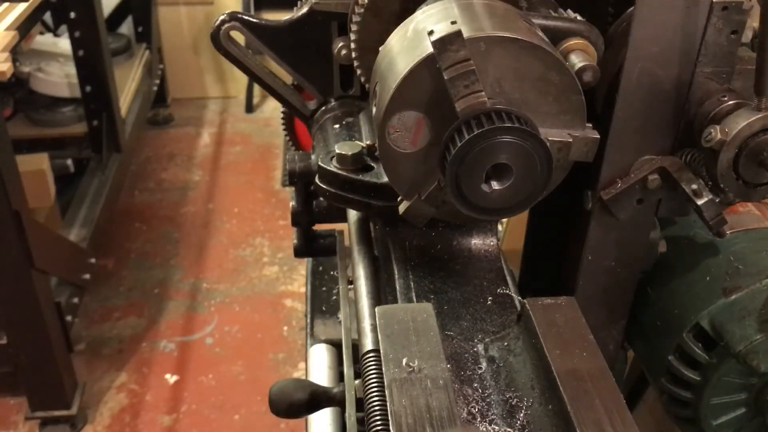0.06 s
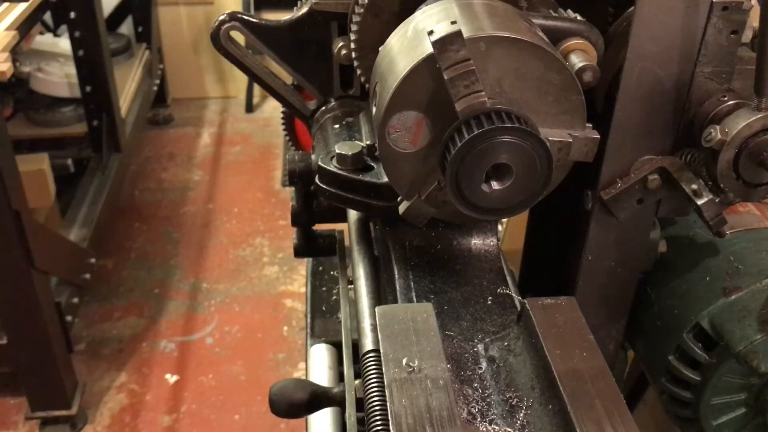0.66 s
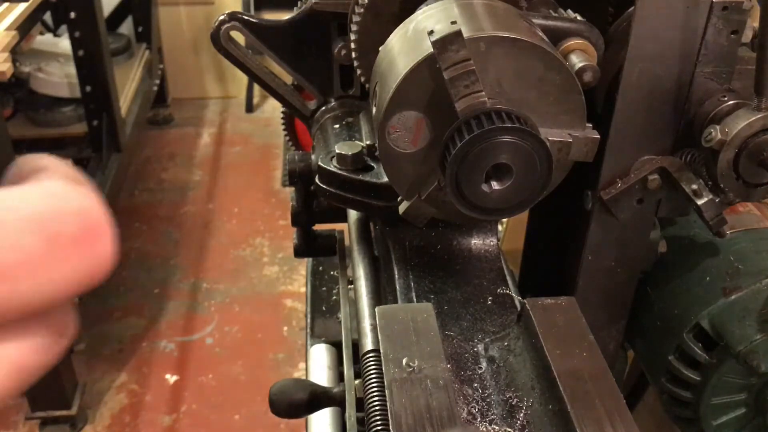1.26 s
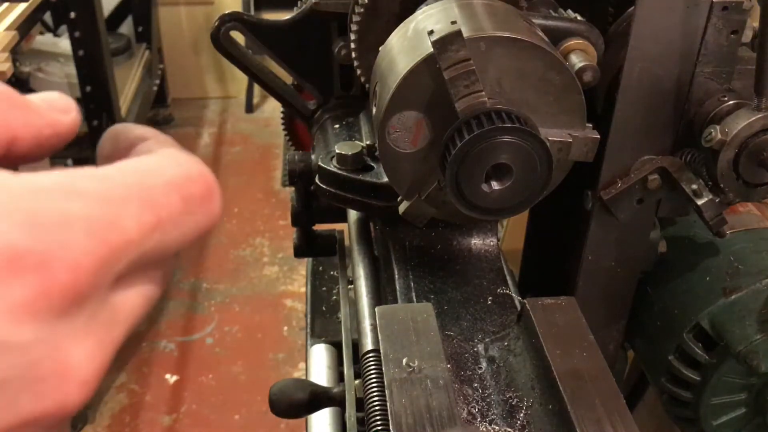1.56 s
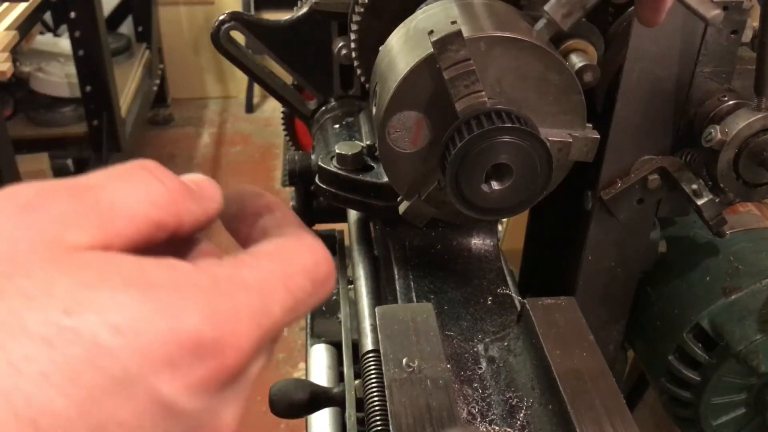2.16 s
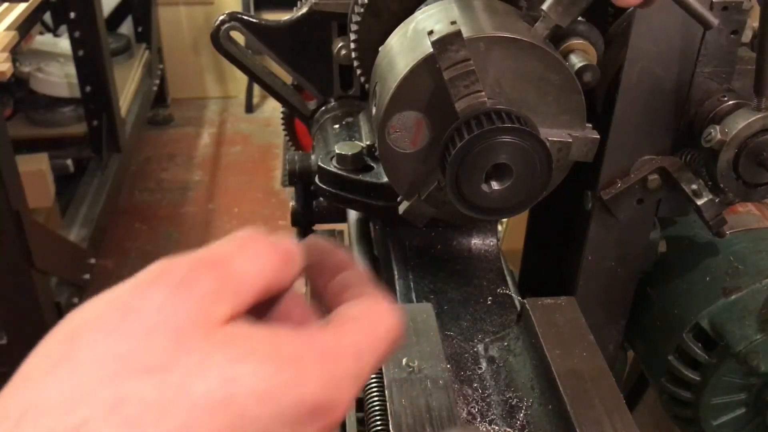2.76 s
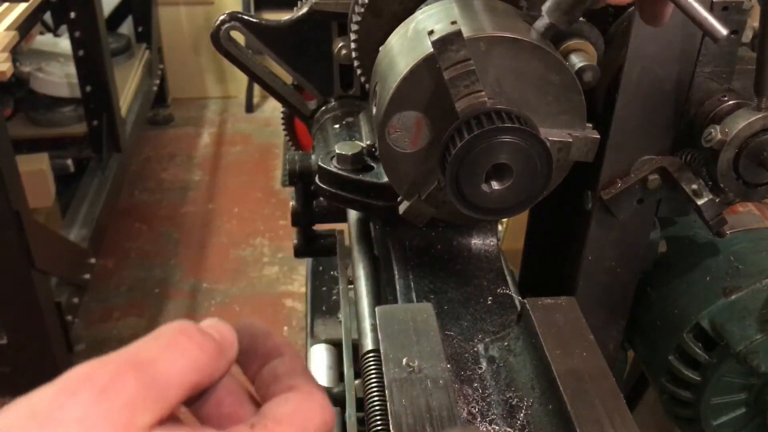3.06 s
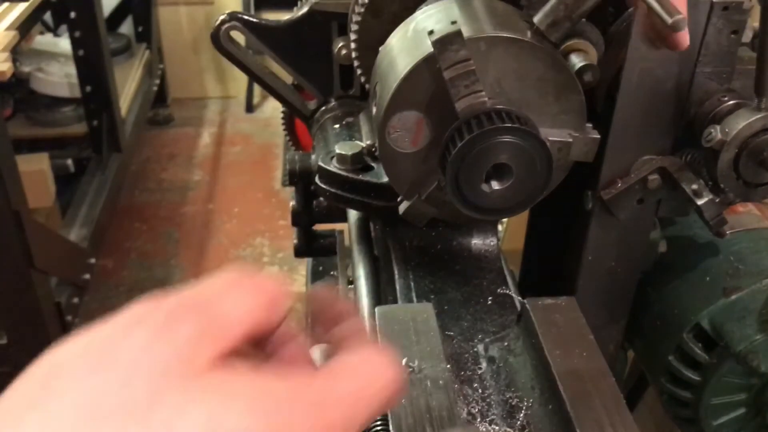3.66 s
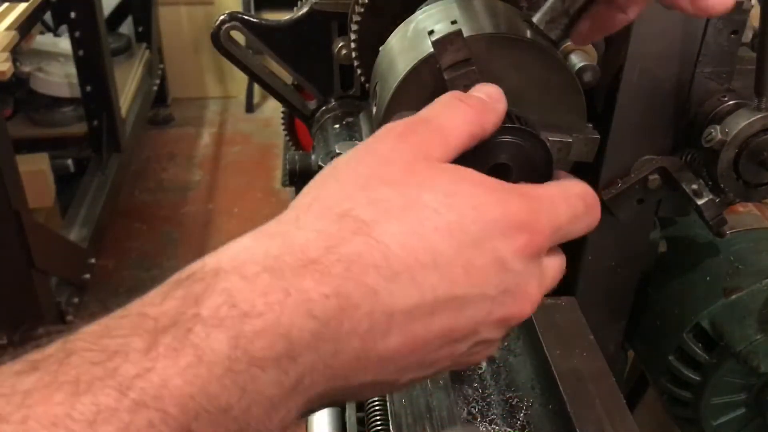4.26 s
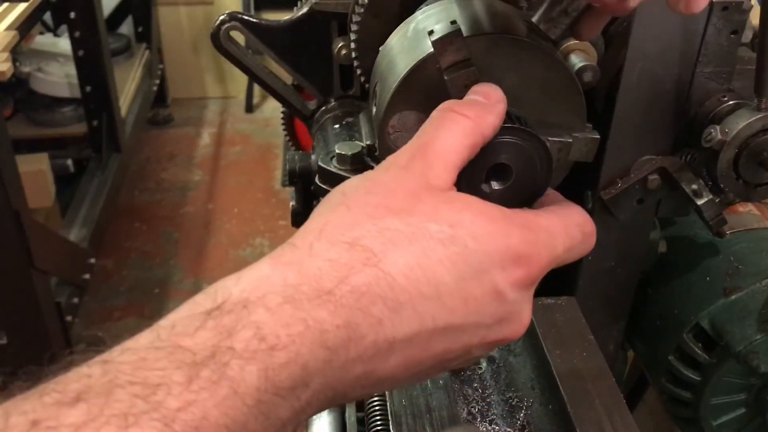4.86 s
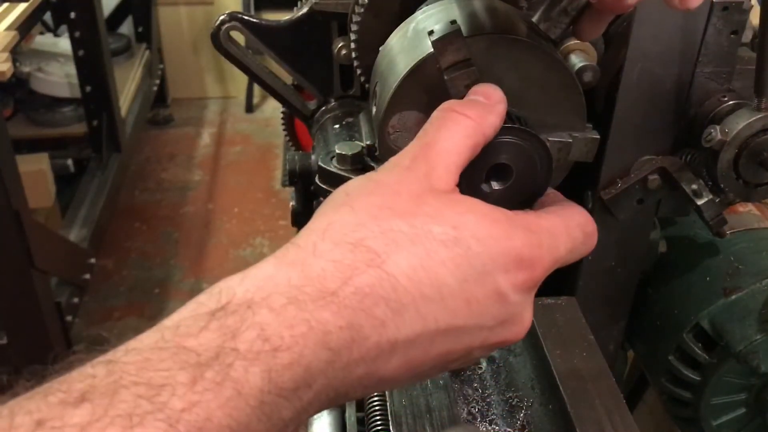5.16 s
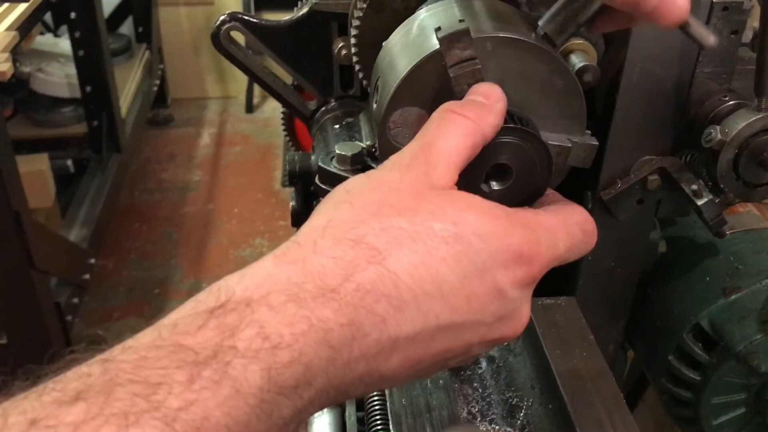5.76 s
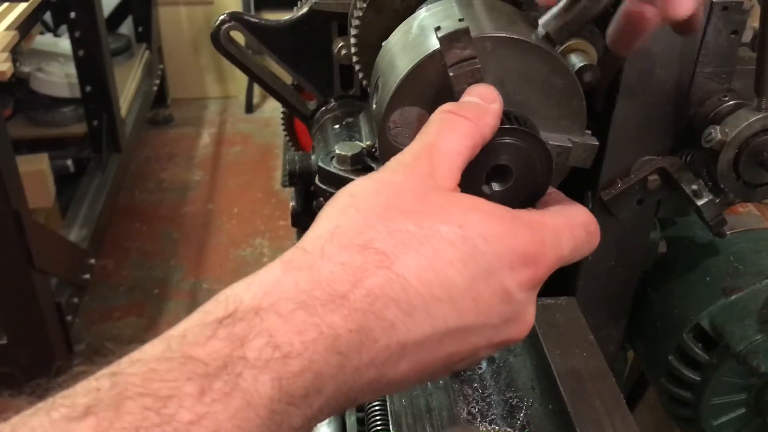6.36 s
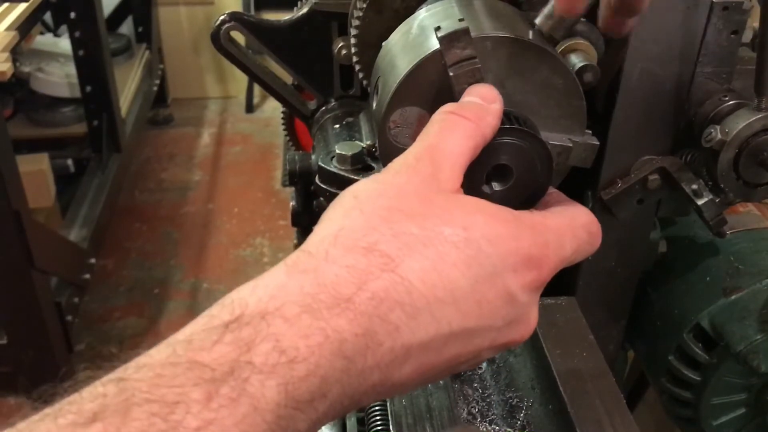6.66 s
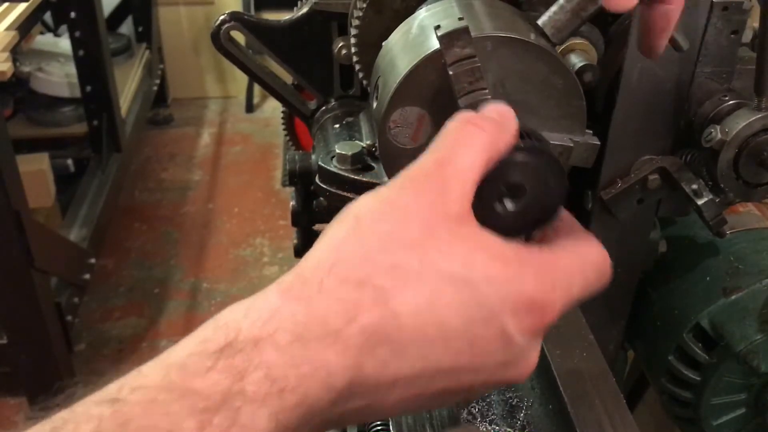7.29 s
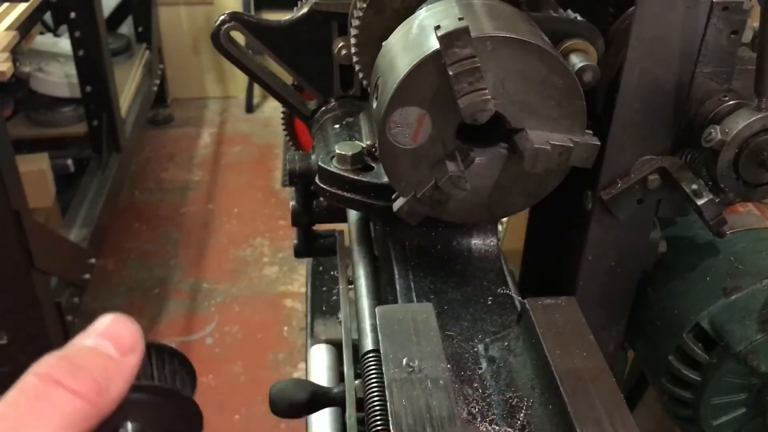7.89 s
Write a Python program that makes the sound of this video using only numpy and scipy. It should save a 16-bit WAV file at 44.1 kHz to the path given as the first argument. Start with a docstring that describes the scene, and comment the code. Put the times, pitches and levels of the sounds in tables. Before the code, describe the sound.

In a quiet small workshop, something scuffs briefly and is set down on wood with a knock. A steel key clinks into the chuck of a stopped lathe, then frees it with one sharp clack and a low shudder. Irregular clicks and short scrapes follow as the key turns, ending with light taps as a small metal part comes out. The sounds are close, with faint sleeve rustle and low room rumble behind them.

```python
"""A lathe stands still in a small workshop, amid faint room rumble and the rustle of a sleeve. Something
scuffs over wood and is set down with a knock. Fingers slide on a steel key and fit it into the chuck;
each contact rings the steel. The key takes up the slack and frees the chuck with a sharp clack that
shakes the bed. It is then turned in short strokes, scroll and jaws clicking and scraping as they stick
and slip, and at last a small metal part is drawn out."""
import sys
import numpy as np
from scipy import signal
from scipy.fft import rfft, irfft
from scipy.io import wavfile

SR = 44100
rng = np.random.default_rng(int(sys.argv[2]) if len(sys.argv) > 2 else 0)


def store_wav(level_fs):
    """Save 16-bit WAV to argv[1]."""
    pcm = np.round(np.clip(np.atleast_2d(level_fs), -1, 1) * 32767)
    wavfile.write(sys.argv[1], SR, pcm.T.astype(np.int16))


N = 349713
TIME = np.arange(N) / SR
TAIL = np.arange(SR // 2) / SR  # time axis of an impulse response

# Levels in the tables are relative; the functions apply further gains.
# hum of the workshop: pitch_hz, level_db
HUM = [(69, -83.5), (98.5, -74)]
# spectrum of the room's rumble and hiss: frequency_hz, level_db
AIR_SPECTRUM = [(20, -42), (33, -11.5), (48, -1.5), (70, 0.5), (85, -7.5), (110, -10.5), (170, -13.5),
                (300, -17), (640, -23.5), (1700, -30), (4800, -36.5), (8600, -39.5), (10400, -41),
                (13000, -35.5), (16000, -45)]
# spectrum of a faint electrical tick: frequency_hz, level_db
TICK_SPECTRUM = [(9500, -34), (11500, 10), (16000, -2)]
# dull thuds under the work: start_s, length_s, level_db
THUDS = [(3.32, 0.36, -60.5), (5.68, 0.31, -58.5), (6.53, .14, -56)]
# spectrum of the thuds: frequency_hz, level_db
THUD_SPECTRUM = [(25, -26.5), (42, -12), (60, 7.5), (105, -2), (140, -44.5), (400, -49.5)]
# movement of the arm, as the strength of its rustle: time_s, level_db
ARM_MOVEMENT = [(0.0, -78.5), (1.04, -81.5), (1.63, -77), (2.63, -79.5), (3.03, -77), (3.84, -78.5),
                (4.39, -78), (4.82, -81), (5.32, -81.5), (5.56, -78), (6.29, -79), (6.4, -80.5),
                (6.85, -77), (6.96, -79), (7.09, -78), (7.35, -79.5), (7.53, -72), (7.93, -76)]
# spectrum of rubbing cloth: frequency_hz, level_db
CLOTH_SPECTRUM = [(150, -19.5), (300, 3), (700, 2.5), (1500, 0), (4500, -4), (6800, -3), (8000, -8),
                  (9400, -3), (10500, -9), (13000, -7), (16000, -8)]
# bright hiss of the scuff on wood (first row), then of fingers on key and part:
# start_s, length_s, level_db
SLIDES = [(.64, 0.034, -62), (1.4, 0.055, -67), (1.61, .057, -70.5), (1.77, 0.18, -71),
          (5.38, 0.082, -68.5), (5.7, 0.055, -62.5), (6.05, 0.2, -63.5), (6.3, 0.065, -64),
          (6.36, 0.061, -64), (6.73, 0.18, -69.5), (7.02, 0.077, -68), (7.27, 0.07, -64), (7.6, 0.13, -68)]
# spectrum of that sliding hiss: frequency_hz, level_db
SLIDE_SPECTRUM = [(300, -21), (1000, 1.5), (5000, -5), (9000, 1.5), (10500, -1.5), (14000, 4), (16000, -4)]

# scuffs on the wood before the knock: start_s, length_s, level_db
SCUFFS = [(.58, 0.077, -62.5), (.645, 0.029, -50), (.66, 0.048, -54.5), (.705, 0.04, -63)]
# spectrum of the scuffs: frequency_hz, level_db
SCUFF_SPECTRUM = [(60, -27), (170, 2.5), (280, 8), (450, -2.5), (950, -4.5), (1600, -12.5), (2450, -11),
                  (3500, -17), (6000, -26), (15000, -35)]
# spectrum of the impact on wood: frequency_hz, level_db
WOOD_CRACK_SPECTRUM = [(50, -4), (170, -1.5), (280, 9), (450, 13), (750, 8.5), (900, 2), (1200, 12),
                       (1600, -5.5), (1950, 5.5), (3000, -5), (4300, -8), (5000, -16), (6200, -17),
                       (15000, -25)]
# modes of the wood: pitch_hz, level_db, t60_s
WOOD_MODES = [(290, 4, 0.12), (380, -20, 0.21), (493, 0, 0.2), (540, -3, 0.058), (604, -3, 0.085),
              (755, -9, 0.22), (1016, -15, .09), (1160, -2, 0.051), (1260, -7, 0.046), (1950, 0, 0.083),
              (2140, -12, 0.17), (2720, 0, 0.082), (3000, -9, 0.067)]
# thin ring after the knock: start_s, length_s, level_db
THIN_RING = [(.78, 0.14, -69.5)]
# spectrum of the thin ring: frequency_hz, level_db
THIN_RING_SPECTRUM = [(1500, -45), (2250, -18), (2370, -5), (2470, -13), (2600, -25), (4000, -54)]
# reverberation time of the workshop: frequency_hz, t60_s
ROOM_DECAY = [(150, 0.5), (500, 0.21), (2500, 0.2449), (7000, 0.22), (14000, 0.3)]
# strength of its reflections: frequency_hz, level_db
ROOM_SPECTRUM = [(150, -4.5), (500, -1.5), (1400, -6.5), (3000, -11.5), (7000, -11.5), (14000, -22.5)]

# steel striking steel: start_s, pitch_hz, level_db, weight_db, corner_hz, bed_shake_db
STEEL_CONTACTS = [(2.062, 2780, -6.5, -15, 3170, -61), (2.0915, 2570, -22, 5, 3620, -63.5),
                  (2.1337, 3620, -25.5, -6, 3880, -68), (2.184, 2520, -19.5, -1, 3180, -80),
                  (2.195, 2620, -10, -12.5, 3300, -56), (2.2051, 3650, -11.5, 3.5, 5060, -56.5),
                  (3.068, 1580, -27, 5, 2380, -76), (3.168, 2260, -28.5, 5.5, 4700, -79),
                  (3.267, 1700, -29, 3, 4300, -77), (3.298, 1760, -15.5, -11, 4700, -57),
                  (3.3093, 1530, -10, -6, 3500, -45.5), (3.316, 9720, 4.5, -1, 17000, -45),
                  (3.671, 3440, -27.5, -7, 8000, -90), (4.087, 900, -32.5, 15.5, 4000, -72),
                  (5.3403, 3650, -38, -1, 15100, -78), (5.567, 2500, -20.5, 8.5, 3700, -60),
                  (5.578, 3080, -22.5, 4.5, 3200, -61), (5.611, 4460, -33.5, 6, 6800, -71),
                  (5.67, 3440, -28.5, 12, 3600, -65), (5.7325, 2740, -30, 4, 4770, -58),
                  (5.8072, 4940, -14.5, -5, 8000, -66), (5.811, 2730, -8.5, -4, 3240, -54),
                  (6.1474, 1680, -22.5, 2, 3800, -63.5), (6.409, 5800, -24.5, -3, 8500, -80),
                  (6.4116, 1690, -18, 3.5, 4410, -55.5), (6.4938, 1820, -23.5, 1.5, 3000, -67),
                  (6.871, 2380, -22.5, 3, 3080, -80), (6.962, 2460, -25, -10, 2520, -65),
                  (7.0667, 2290, -29, 1, 3200, -72), (7.0754, 2230, -28, -4, 3200, -72),
                  (7.0821, 2660, -13, -3.5, 7600, -49.5), (7.357, 3120, -26.5, -5, 3850, -69.5),
                  (7.8166, 3300, -24, 1, 4500, -74), (7.856, 1940, -33.5, 19.5, 3900, -81)]
# spectrum of a hard contact, and how much weight adds to it: frequency_hz, level_db, weight_share
BLOW_SPECTRUM = [(40, -37, 1), (110, -20.5, 0.93), (200, 4.5, 0.89), (330, 0, 0.9), (415, -2.5, 0.81),
                 (600, -9, 1), (1000, -1.5, 0.62), (1430, 0.5, 0.58), (2100, -1.5, 0), (3600, 0.5, 0),
                 (4900, 0.5, 0.04), (7150, 0.5, 0.42), (8800, 0.5, 0.13), (10620, -4, 0.19),
                 (13200, 0, 0.082), (16000, -2, 0.31)]
# modes of chuck and key: pitch_hz, level_db, t60_s
CHUCK_MODES = [(624, -5, .45), (1052, -0.5, 0.13), (1368, 2.5, 0.087), (1455, 3.5, .09),
               (1607, -3.5, 0.064), (1874, -4, .13), (2294, 7.5, 0.059), (2840, -2, .14), (3150, -3, 0.11),
               (3320, -4, .1), (3760, -6.5, 0.11), (4620, -6, .11), (4690, -3, .07), (5190, -7, 0.13),
               (5800, -3, 0.15), (7300, -12, .1), (8500, 2.5, 0.078), (9620, -22, 0.11)]
# modes of the lathe bed swaying on its stand: pitch_hz, level_db, t60_s
BED_MODES = [(67.5, -13, .5), (158.1, -0.5, 0.29), (193, -7.5, 0.11), (311, -4, 0.14), (396, -6.5, 0.1),
             (457, -11.5, 0.055)]
# strokes of the hand on the key and the part: start_s, length_s, rock_db, groan_db, scrape_db
HAND_STROKES = [(2.07, .14, -64.5, -69, -66), (3.0, .07, -77, -87, -69), (3.13, .16, -77, -88, -76),
                (5.58, .11, -61, -73, -74), (5.71, 0.075, -55, -67, -72), (5.95, 0.077, -71.5, -73, -67),
                (6.137, 0.044, -70, -56.5, -71), (6.48, 0.15, -61.5, -67.5, -78),
                (6.816, 0.052, -64, -58, -68.5), (7.301, .072, -64, -66.5, -58),
                (7.69, .17, -66.5, -66.5, -64.5)]
# spectrum of scraping steel: frequency_hz, level_db
SCRAPE_SPECTRUM = [(40, -40), (150, -24.5), (500, 2.5), (1400, 5.5), (2700, 3.5), (3800, -1), (5000, -11),
                   (15000, -19.5)]


def from_db(db):
    """Amplitude grows tenfold for every 20 dB."""
    return 10 ** (np.asarray(db) / 20)


def unit_rms(x):
    """Normalisation to a mean power of 1."""
    return x / np.sqrt(np.mean(x ** 2) + 1e-20)


def unit_energy(x):
    """Normalisation to the energy of a unit impulse."""
    return x / np.sqrt(np.sum(x ** 2) + 1e-20)


def at_hz(points, hz):
    """Interpolation on a logarithmic frequency axis."""
    known_hz, values = np.transpose(points)
    return np.interp(np.log(np.maximum(hz, 1)), np.log(known_hz), values)


def add(out, start_s, sound):
    """Superposition: a sound adds to those already present."""
    start = int(np.clip(round(start_s * SR), 0, N - 1))
    out[start:start + len(sound)] += sound[:N - start]


def coloured(x, spectrum, size=4096):
    """Minimum-phase filtering shapes the spectrum causally: nothing sounds before its onset."""
    hz = np.arange(size // 2 + 1) * SR / size
    cepstrum = irfft(np.log(from_db(at_hz(spectrum, hz))))
    cepstrum[1:size // 2] *= 2
    cepstrum[size // 2 + 1:] = 0
    response = irfft(np.exp(rfft(cepstrum)))
    return signal.fftconvolve(x, response)[:len(x)]


def noise(spectrum):
    """Filtered white noise takes on the spectrum of the filter; its rms is 1."""
    return unit_rms(coloured(rng.standard_normal(N), spectrum))


def swell(length_s):
    """A half-sine envelope rises and falls smoothly."""
    return np.sqrt(np.hanning(max(int(length_s * SR), 2)))


def swells(rows):
    """Swells (start_s, length_s, level_db) sum to one amplitude envelope."""
    gain = np.zeros(N)
    for start_s, length_s, level_db in rows:
        add(gain, start_s, from_db(level_db) * swell(length_s))
    return gain


def decay(t, t60_s):
    """Damping is exponential: the level falls 60 dB in t60_s."""
    return np.exp(-np.log(1000) * t / t60_s)


def ring(modes, spread_db):
    """Free vibration is a sum of damped sinusoids, here scattered in strength and sign."""
    hz, level_db, t60_s = np.transpose(modes)[:, :, None]
    gain = from_db(level_db + spread_db * rng.standard_normal(hz.shape))
    sign = rng.choice([-1, 1], hz.shape)
    return np.sum(gain * sign * decay(TAIL, t60_s) * np.sin(2 * np.pi * hz * TAIL), axis=0)


def crack(hold_s, t60_s, size=2048):
    """Modal overlap: just after a blow, countless damped modes merge into a broadband burst."""
    fade = decay(np.maximum(TAIL[:size] - hold_s, 0), t60_s)
    burst = rng.standard_normal(size) * fade
    for _ in range(2):  # flatten the spectrum, then restore the decay
        flat = irfft(np.exp(1j * np.angle(rfft(burst))))
        burst = flat * np.sqrt(fade)
    return unit_energy(np.pad(burst, (0, len(TAIL) - size)))


def background(air_db, first_tick_s, tick_period_s, tick_db):
    """Ambient sound is a superposition: rumble and hiss, hum, electrical ticking and a few dull thuds."""
    air = from_db(air_db) * noise(AIR_SPECTRUM)
    hum = sum(from_db(db) * np.sqrt(2) * np.sin(2 * np.pi * hz * TIME) for hz, db in HUM)
    tick_times = np.arange(first_tick_s, TIME[-1], tick_period_s)
    impulses = np.zeros(N)
    impulses[(tick_times * SR).astype(int)] = from_db(tick_db)
    thuds = swells(THUDS) * noise(THUD_SPECTRUM)
    return air + hum + coloured(impulses, TICK_SPECTRUM) + thuds


def flutter(depth_db, per_s):
    """Uneven friction modulates the amplitude at random."""
    knots = np.arange(0, TIME[-1] + 1, 1 / per_s)
    return from_db(depth_db * np.interp(TIME, knots, rng.standard_normal(len(knots))))


def rustling(sleeve_db, rest_db):
    """Sliding friction hisses: the sleeve rustles; the scuff on wood and the fingers flutter faster."""
    arm = from_db(np.interp(TIME, *np.transpose(ARM_MOVEMENT)))
    moving = np.sqrt(np.maximum(arm ** 2 - from_db(rest_db) ** 2, 0))  # only power above rest sounds
    sleeve = from_db(sleeve_db) * moving * noise(CLOTH_SPECTRUM)
    slides = swells(SLIDES) * noise(SLIDE_SPECTRUM)
    return sleeve * flutter(depth_db=1.23, per_s=110) + slides * flutter(depth_db=3.0, per_s=480)


def wooden_knock(knock_s, level_db, ring_db):
    """Impact excitation: after a few scuffs, a blow sets the wood's modes ringing; a thin ring follows.
    Returns the direct sound and the part sent into the room."""
    radiated = swells(SCUFFS) * noise(SCUFF_SPECTRUM)
    impact = coloured(crack(hold_s=0.0045, t60_s=0.016), WOOD_CRACK_SPECTRUM)
    add(radiated, knock_s, from_db(level_db) * impact)
    direct = radiated + swells(THIN_RING) * noise(THIN_RING_SPECTRUM)
    resonance = unit_energy(ring(WOOD_MODES, spread_db=-5.0))
    add(direct, knock_s, from_db(level_db + ring_db) * resonance)
    return direct, radiated


def reverberation(x, build_s, bands=9):
    """Reflections off nearby clutter build into a diffuse field that lingers longest in the bass."""
    hz = np.fft.rfftfreq(len(TAIL), 1 / SR)
    centres = np.geomspace(100, 16000, bands)
    white = rfft(rng.standard_normal(len(TAIL)))
    onset = 1 - np.exp(-(TAIL / build_s) ** 2)
    response = 0
    for centre, weights in zip(centres, np.eye(bands)):
        band = irfft(white * at_hz(np.c_[centres, weights], hz), len(TAIL))
        envelope = unit_energy(onset * decay(TAIL, at_hz(ROOM_DECAY, centre)))
        response += band * envelope * from_db(at_hz(ROOM_SPECTRUM, centre))
    return signal.fftconvolve(x, response)[:N]


def steel_contacts(ring_db, bed_db, note_db, note_t60_s, bed_build_s, snap_db, radiated_db):
    """Impacts excite the touched part, chuck and bed. Weight fills in the bass; a harder contact has
    a higher corner frequency. Returns the direct sound and the part sent into the room."""
    roll_off_db_per_octave, floor_db, touch_db = 21.5, -22, -23
    direct, radiated = np.zeros((2, N))
    blow_hz, blow_db, weight_share = np.transpose(BLOW_SPECTRUM)
    for start_s, pitch_hz, level_db, weight_db, corner_hz, shake_db in STEEL_CONTACTS:
        hard_db = blow_db + weight_share * weight_db
        softening_db = np.clip(-roll_off_db_per_octave * np.log2(blow_hz / corner_hz), floor_db, 0)
        spectrum = np.c_[blow_hz, hard_db + softening_db]
        # the touched part has a short note of its own
        note = from_db(note_db) * unit_energy(ring([(pitch_hz, 0, note_t60_s)], spread_db=0))
        # the first touch leaves a faint, bright tick, then the shock spreads through the steel
        snap = crack(hold_s=0.0012, t60_s=0.0096)
        touch = from_db(touch_db) * coloured(snap, np.c_[blow_hz, hard_db])
        shock = unit_energy(from_db(snap_db) * snap + crack(hold_s=0.0025, t60_s=0.064))
        blow = from_db(level_db) * (touch + coloured(shock + note, spectrum))
        resonance = unit_energy(ring(CHUCK_MODES, spread_db=0.5))
        chuck = from_db(level_db + ring_db) * coloured(resonance, spectrum)
        # the heavy bed takes a few cycles to get moving
        onset = 1 - np.exp(-TAIL / bed_build_s)
        bed = from_db(shake_db + bed_db) * ring(BED_MODES, spread_db=5.0) * onset
        add(direct, start_s, blow + chuck + bed)
        add(radiated, start_s, from_db(radiated_db) * blow)
    return direct, radiated


def scraping(slips_per_s, spread_db, ring_db):
    """Stick-slip friction: rough steel catches and lets go in tiny impulses that excite the chuck."""
    slips = (rng.random(N) < slips_per_s / SR) * rng.choice([-1, 1], N)
    strength = from_db(spread_db * np.minimum(rng.exponential(1, N), 4))
    click = crack(hold_s=0.001, t60_s=0.087)
    chuck = from_db(ring_db) * unit_energy(ring(CHUCK_MODES, spread_db=-6.0))
    grit = signal.fftconvolve(slips * strength, click + chuck)[:N]
    sliding = swells([(start_s, length_s, db) for start_s, length_s, _, _, db in HAND_STROKES])
    return sliding * unit_rms(coloured(grit, SCRAPE_SPECTRUM))


def rumble(modes, length_s):
    """Forced vibration: a random force swells and fades on a set of modes; rms about 1 at its height."""
    envelope = swell(length_s)
    force = envelope * rng.standard_normal(len(envelope))
    vibration = signal.fftconvolve(force, ring(modes, spread_db=2.5))
    return np.sqrt(len(force) / 2) * unit_energy(vibration)


def bed_rocking(t60_scale, groan_above_hz, grip_s, grip_length_s, grip_db):
    """Damped resonance: hand pressure drives the bed's low modes, scroll friction the higher ones."""
    low = [(hz, db, t60_s * t60_scale) for hz, db, t60_s in BED_MODES if hz < groan_above_hz]
    high = [(hz, db, t60_s * t60_scale) for hz, db, t60_s in BED_MODES if hz >= groan_above_hz]
    out = np.zeros(N)
    # the other hand takes hold of the part and leans on the bed
    add(out, grip_s, from_db(grip_db) * rumble(low, grip_length_s))
    for start_s, length_s, rock_db, groan_db, _ in HAND_STROKES:
        add(out, start_s, from_db(rock_db) * rumble(low, length_s))
        add(out, start_s, from_db(groan_db) * rumble(high, length_s))
    return out


def scene():
    """Direct sound and reverberation superpose at one listening point."""
    steel, steel_radiated = steel_contacts(ring_db=-12.0, bed_db=5.5, note_db=-9.0, note_t60_s=0.0093,
                                           bed_build_s=0.0084, snap_db=-3.5, radiated_db=-1.94)
    wood, wood_radiated = wooden_knock(knock_s=0.7408, level_db=-2, ring_db=-8.5)
    scrapes = scraping(slips_per_s=1000, spread_db=4.0, ring_db=-12.5)
    room = reverberation(steel_radiated + wood_radiated + scrapes, build_s=0.0058)
    bed = bed_rocking(t60_scale=0.78, groan_above_hz=250, grip_s=3.8, grip_length_s=0.75, grip_db=-59.5)
    rustle = rustling(sleeve_db=7.5, rest_db=-82.5)
    ambience = background(air_db=-64.5, first_tick_s=0.0972, tick_period_s=0.10245, tick_db=-53)
    return (ambience + rustle + wood + room + steel + scrapes + bed)[None]


def record(dry):
    """An elliptic low-pass filter cuts the highest treble steeply."""
    cutoff_hz = 16100
    return signal.sosfilt(signal.ellip(10, .3, 70, cutoff_hz, fs=SR, output="sos"), dry)


dry = scene()
out = record(dry)
store_wav(out)
```